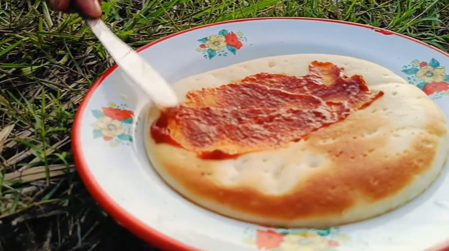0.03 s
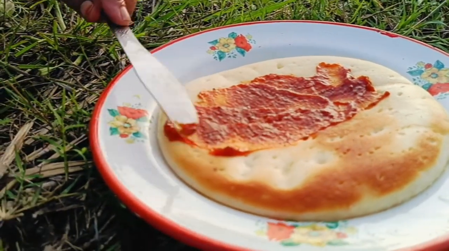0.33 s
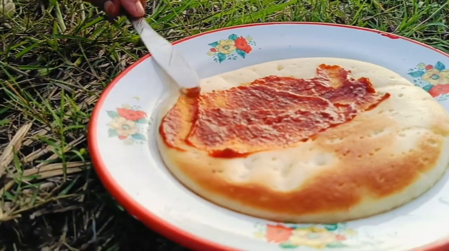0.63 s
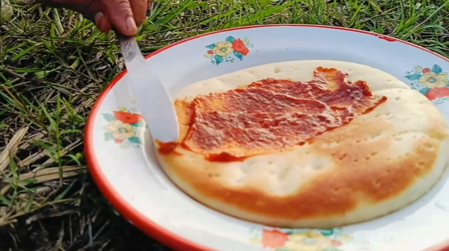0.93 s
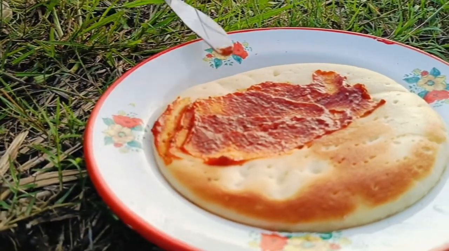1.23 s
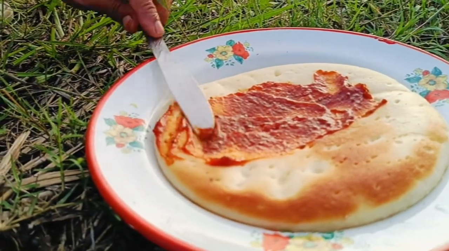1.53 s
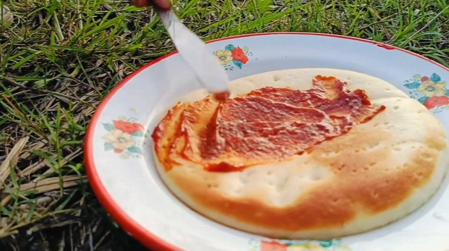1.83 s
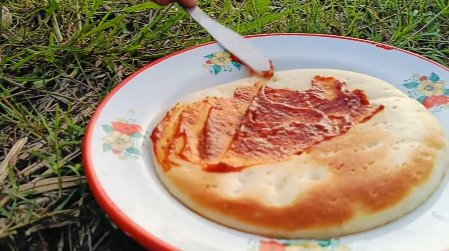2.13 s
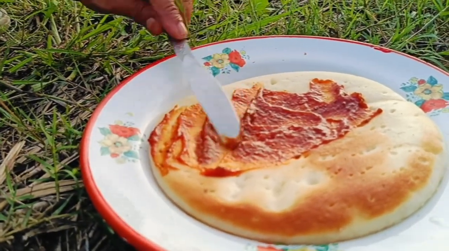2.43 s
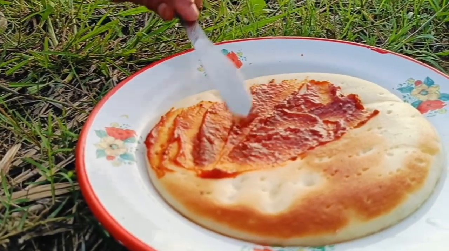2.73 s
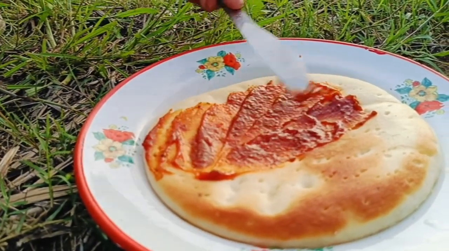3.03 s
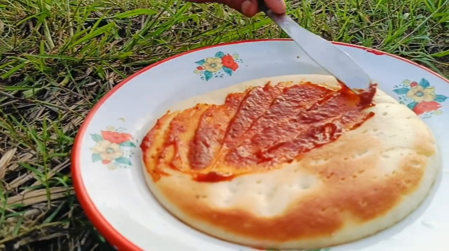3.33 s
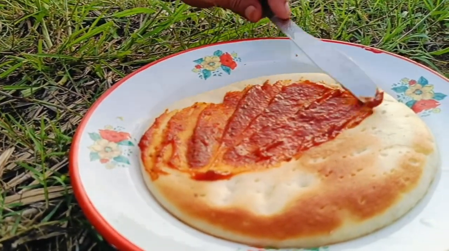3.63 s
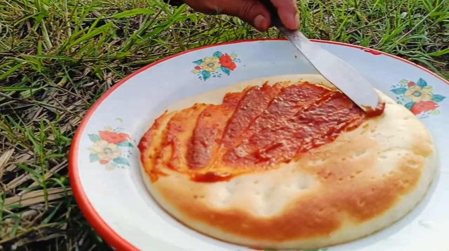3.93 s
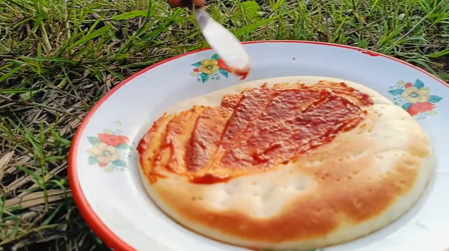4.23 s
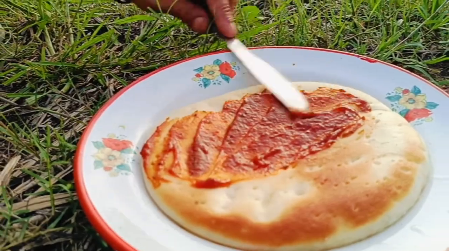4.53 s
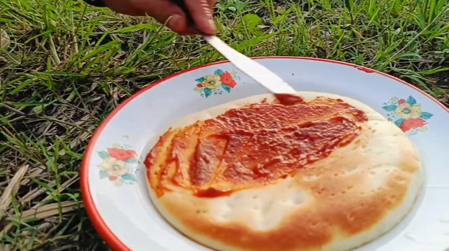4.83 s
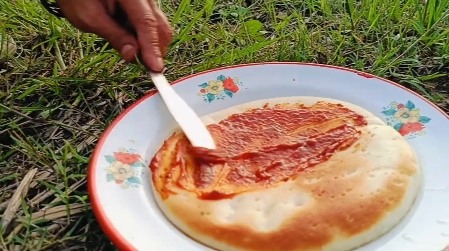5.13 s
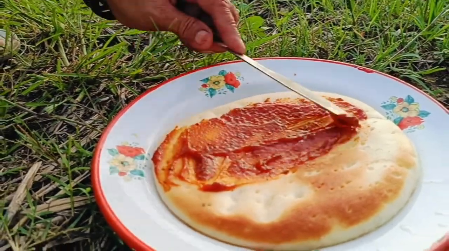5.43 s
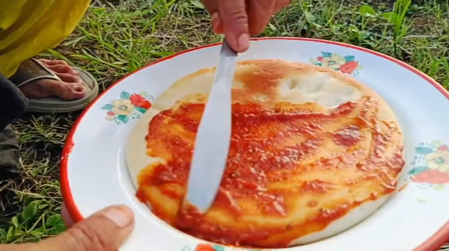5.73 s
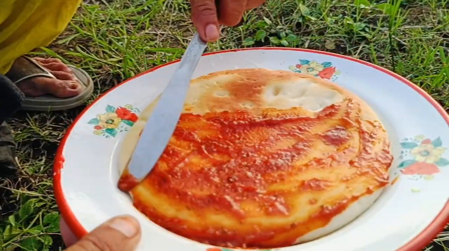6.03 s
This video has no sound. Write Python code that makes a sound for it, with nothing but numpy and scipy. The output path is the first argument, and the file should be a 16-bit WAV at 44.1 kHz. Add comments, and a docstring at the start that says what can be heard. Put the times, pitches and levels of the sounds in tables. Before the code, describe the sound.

A table knife spreads sauce over flatbread close by, opening with a soft wet pat and continuing in strokes about every half second, with dull pops, squelches and a fine hiss. The loudest sounds are quick, bright clinking scrapes of the blade over an enamel plate's rim, at about 0.7, 1.2, 1.7 and 2.2 seconds, each leaving a faint ring. From 2.5 to 4.2 seconds the wet strokes carry on with a few tiny sticky snaps. Two more rim scrapes come at 4.2 and 4.7 seconds, followed by softer spreading and a light blade tick at 6 seconds. Small birds give scattered high chirps and pips, the clearest at 2 seconds, with a rising whistle near 5.8 seconds, while others call faintly far off. Quiet outdoor air, a low rumble and an intermittent distant hum lie underneath.

```python
"""A soft wet pat, then strokes: a table knife spreads sauce over a flatbread on an enamel plate, on grass.
The sauce sticks and slips, giving dull pops through the bread, a fine hiss and sticky snaps.
Between strokes the blade chatters over the rim in six quick wipes; the rim rings on faintly.
Small birds chirp, pip and whistle nearby, others call far off, over outdoor air, a low rumble
and a distant hum."""
import sys
import numpy as np
from scipy import signal
from scipy.fft import rfft, irfft
from scipy.io import wavfile

SR = 44100
rng = np.random.default_rng(int(sys.argv[2]) if len(sys.argv) > 2 else 0)


def transcribe(u):
    """Save the signal u as a 16-bit wav file named by the first command-line argument.

    u: samples, shape (n,) or (channels, n), limited to [-1, 1]; the rate is SR.
    q: integer samples, one column per channel.
    """
    v = np.clip(np.atleast_2d(u).T, -1, 1)
    q = np.round(v * 32767).astype(np.int16)
    wavfile.write(sys.argv[1], SR, q)


N = 267995
TIME = np.arange(N) / SR
BINS = np.fft.rfftfreq(4096, 1 / SR)

# Spreading strokes. Each row: landing, firmest moment and end in seconds, pat, plop and squelch levels
# in dB, squelch pitch in Hz, hiss level in dB.
SAUCE_STROKES = [(0, 0.016, 0.12, -35.5, -36, -44.5, 400, -49.5),
                 (0.599, 0.636, 0.73, -60, -56, -57.5, 328, -61.5),
                 (1.111, 1.196, 1.374, -49, -49, -48, 366, -55.5),
                 (1.626, 1.675, 1.8, -36.5, -35, -51, 329, -61.5),
                 (2.085, 2.153, 2.227, -34.5, -40, -47, 427, -55.5),
                 (2.55, 2.596, 2.745, -32.5, -37, -45, 460, -61),
                 (2.93, 3.002, 3.044, -38.5, -39, -41, 450, -59.5),
                 (3.294, 3.363, 3.435, -35, -37, -39.5, 312, -56.5),
                 (3.661, 3.717, 3.79, -41, -50, -47.5, 380, -63.5),
                 (3.932, 3.962, 4.185, -30, -34, -40, 440, -46),
                 (4.601, 4.656, 4.73, -61, -61, -59, 353, -70),
                 (5.11, 5.154, 5.26, -57.5, -47, -56.5, 450, -61.5),
                 (5.212, 5.246, 5.38, -38.5, -36, -58, 512, -60.5),
                 (5.627, 5.654, 5.92, -44, -48.5, -62, 302, -64),
                 (6.001, 6.035, 6.13, -65, -58.5, -74, 563, -52.5)]
# Noise spectra of air and rumble. Each row: frequency in Hz, relative density in dB.
AIR_SPECTRUM = [(88, -41), (150, -3.5), (315, -16), (524, -16), (662, -20), (774, -20), (1530, -24),
                (2140, -23), (3220, -24.5), (4240, -24.5), (5680, -33.5), (8560, -30), (16000, -58)]
RUMBLE_SPECTRUM = [(20, -19.5), (45, -14), (70, 3.5), (110, -2), (160, -11.5), (260, -18), (500, -27),
                   (1500, -66.5)]
# Likeness of that noise at the two ears. Each row: frequency in Hz, correlation.
EAR_CORRELATION = [(50, .9), (200, 0.81), (600, 0), (2000, 0), (16000, 0.07)]
# Course of the rumble. Each row: time in seconds, level in dB.
RUMBLE_ENVELOPE = [(0, -53), (.7, -58), (2.1, -58), (2.8, -64.5), (5.3, -61), (6.08, -59)]
# Swells of the hum. Each row: start and end in seconds.
HUM_SPANS = [(.03, 0.35), (.41, 1.24), (1.3, 1.58), (1.63, 1.97), (2.02, 2.38), (5.62, 5.96)]
# Far birds. Each row: start and length in seconds, pitch in Hz, level in dB.
FAR_BIRD_CALLS = [(.18, .58, 2125, -70), (.88, .12, 3500, -70), (1.5, .12, 2502, -67.5),
                  (3.6, .09, 3590, -69)]
# Arched chirps. Each row: time of the top in seconds, top pitch in Hz, level in dB, delay from top to
# loudest point in seconds.
BIRD_CHIRPS = [(0.612, 8250, -57, 0.027), (.965, 7500, -73, 0.021), (2.031, 8560, -42, .03),
               (2.944, 8420, -58, 0.032), (3.655, 7840, -71, .025), (5.27, 8540, -57.5, 0.028),
               (5.491, 7860, -52, 0.013), (5.813, 7480, -67, 0.031)]
# Wipes over the rim. Each row: landing, firmest moment and leaving in seconds, clink, slide and push
# levels in dB, bass and treble trims in dB, frequency favoured by that spot in Hz, its lift in dB,
# squeal pitches of clink, slide and push in Hz.
RIM_WIPES = [(.709, 0.764, .794, -23.5, -34, -29.5, 0, -1, 830, 4, 3530, 9300, 3650),
             (1.248, 1.294, 1.322, -16, -26, -16.5, -2.5, 2, 2750, 4.5, 4550, 4780, 2830),
             (1.744, 1.794, 1.8385, -13, -30, -27, 0.5, 0.5, 1690, 2, 4530, 3900, 3780),
             (2.226, 2.269, 2.284, -13, -31.5, -27.5, -1.5, -0.5, 1254, 3.5, 3860, 4146, 2210),
             (4.188, 4.261, 4.293, -15, -31, -24.5, -1, 1, 1240, 7, 3800, 4200, 4900),
             (4.730, 4.751, 4.806, -20, -32, -27, -1.5, -1, 508, 12.5, 3660, 3700, 4760)]
# Modes of blade and plate in contact. Each row: frequency and width in Hz, left and right gains in dB.
CONTACT_MODES = [(416, 112, -11, -12), (515, 99, -14.5, -14), (804, 100, -11, -17.5),
                 (1218, 190, -12.5, -9), (1438, 117, -9, -9), (1855, 210, -11, -11.5), (2190, 114, -9, -35),
                 (2330, 193, -15, -21), (2720, 73, -15, -16), (2810, 71, -13.5, -14.5),
                 (3213, 73, -13, -10), (3530, 220, -11.5, -17), (3755, 190, -15.5, -1),
                 (4127, 185, -21, -10.5), (4460, 430, -34, -7.5), (4700, 250, -11.5, -4.5),
                 (5010, 300, -24.5, -11.5), (5354, 290, -27, -10.5), (5640, 170, -23, -10.5),
                 (6110, 239, -23, -11), (6470, 190, -27.5, -12), (6900, 160, -27, -8),
                 (7770, 180, -30.5, -5), (7950, 95, -23, -9.5), (8120, 490, -25.5, -13),
                 (9370, 510, -18.5, -12), (9060, 920, -17, -14.5), (9380, 239, -24.5, -24)]
# Floor between those modes. Each row: frequency in Hz, gain in dB.
CONTACT_FLOOR = [(40, -48), (250, -33), (1000, -42), (9500, -40), (10200, -41), (11500, -31.5),
                 (13500, -38.5), (16000, -44)]
# Sharp modes of the thin blade. Each row: frequency and width in Hz, relative gain in dB.
BLADE_MODES = [(1150, 26, -14.5), (1855, 45, -8), (2851, 34, -10), (3280, 33, -12), (4670, 64, -0.5),
               (6420, 33, -9), (7500, 40, -7), (7855.2, 23, -10.5), (8100, 55, -6.5)]
# Modes of the free plate. Each row: frequency in Hz, relative level in dB, T60 in seconds.
RIM_MODES = [(991, -10, .25), (1560, -2.5, 0.72), (2134, -0.5, .58), (2627, -2.5, .7), (2886.7, -4, 0.24),
             (3020, -9.5, 0.49), (3400, -1, 0.34), (3825, 11, 0.23), (4140, -3.5, 0.24),
             (4467.5, -7.5, 0.15)]
# Ring after each wipe. Each row: level in dB, frequency favoured by that spot in Hz, its lift in dB,
# time the knife presses again in seconds.
RIM_RELEASES = [(-60.5, 3410, 10.5, 1.13), (-46, 3800, 0, 1.9), (-52.5, 3800, 5, 2.07),
                (-52.5, 2130, 8, 2.5), (-51.5, 1570, 0.5, 4.6), (-58.5, 2280, 10, 4.93)]
# Sauce snaps and blade touches. Each row: start in seconds, level in dB, pitch in Hz, broad share in dB.
SNAP_TICKS = [(1.062, -46, 2700, -26), (3.613, -43, 10640, -20), (3.735, -43, 4170, -3),
              (3.832, -49.5, 9000, -29), (4.05, -33, 4270, -25), (4.546, -38, 2240, -25),
              (4.689, -38, 2140, -25.5), (4.963, -41.5, 1850, -21), (5.244, -43, 2063, -18),
              (6.005, -26.5, 2180, -3)]
# Pips of another bird. Each row: start in seconds, pitch in Hz, level in dB.
BIRD_PIPS = [(2.29, 2820, -53), (2.342, 2860, -67), (4.818, 2820, -58), (5.285, 2860, -65.5),
             (5.338, 2849, -63.5), (5.555, 2540, -66.5)]
# Rising bird whistle. Each row: time in seconds, pitch in Hz.
WHISTLE_PITCH = [(5.78, 2706), (5.924, 3427), (6.014, 4450), (6.034, 5050), (6.054, 5330), (6.077, 5083)]


def amp(db):
    """Decibels to gain."""
    return 10 ** (np.asarray(db) / 20)


def unit(x):
    """Scales to an rms of one."""
    return x / np.sqrt(np.mean(x ** 2) + 1e-20)


def read(points, hz):
    """Interpolates a spectrum table over log frequency."""
    knots_hz, values = np.transpose(points)
    return np.interp(np.log(hz + 1), np.log(knots_hz + 1), values)


def clock(length_s):
    """Sample times in seconds."""
    return np.arange(max(int(length_s * SR), 16)) / SR


def add(mix, start_s, sound):
    """Lays a sound into the stereo mix."""
    part = mix[:, max(round(start_s * SR), 0):][:, :sound.shape[-1]]
    part += sound[..., :part.shape[1]]


def pan(right_db):
    """Ear gains for a right-over-left level difference."""
    return amp([[-right_db / 2], [right_db / 2]]) / np.sqrt(np.mean(amp([-right_db, right_db])))


def drift(count, hz):
    """Random wander: lines between unit normal draws, hz of them a second."""
    knots = rng.standard_normal(4096)
    return np.interp(np.arange(count) * hz / SR, np.arange(len(knots)), knots)


def colour(x, gain):
    """Minimum-phase filter with this gain over BINS."""
    log_gain = np.log(np.maximum(np.atleast_2d(gain), 1e-5))
    mirrored = np.concatenate([log_gain, log_gain[:, -2:0:-1]], axis=1)
    response = np.fft.ifft(np.exp(np.conj(signal.hilbert(mirrored)))).real
    return signal.fftconvolve(np.atleast_2d(x), response, axes=1)


def bump(hz, width_hz):
    """Power response of one resonance over BINS."""
    return (1 + (2 * (BINS - hz) / width_hz) ** 2) ** -1.5


def grains(count, per_s, spread_db):
    """Randomly spaced tiny impacts of uneven size."""
    chance, size, sign = rng.random((3, count))
    strength = amp(spread_db * np.minimum(-np.log(size), 3))
    return unit((chance < per_s / SR) * strength * np.sign(sign - .5))


def noise(spectrum):
    """Steady stereo noise, most alike in the bass."""
    hz = np.fft.rfftfreq(N, 1 / SR)
    left, other = rfft(rng.standard_normal((2, N)))
    correlation = np.clip(read(EAR_CORRELATION, hz), -1, 1)
    right = correlation * left + np.sqrt(1 - correlation ** 2) * other
    return unit(irfft(np.array([left, right]) * amp(read(spectrum, hz)), N))


def tone(hz):
    """Unit-rms sine along a pitch curve."""
    return np.sqrt(2) * np.sin(2 * np.pi * np.cumsum(hz) / SR)


def bread_gain(hz, width_ratio, wet_db, wet_hz, muffle_hz=1500):
    """Gain through the bread: one dull hump, a wet skirt above it, no deep bass."""
    hump = np.sqrt(bump(hz, width_ratio * hz) / (1 + (BINS / muffle_hz) ** 4))
    skirt = amp(wet_db) / (1 + (BINS / wet_hz) ** 2) / (1 + (BINS / 8000) ** 8)
    return (hump + skirt) * BINS ** 2 / (BINS ** 2 + (hz / 3) ** 2)


def bread_pop(hz, width_ratio):
    """The bread's answer to one impulse: a few dull cycles and a small wet smack."""
    pop = colour(np.ones(1), bread_gain(hz, width_ratio, wet_db=-29, wet_hz=1900))
    return pop / abs(pop).max()


def spreading(swell_power=1.05, trail_db=-25.5, trail_power=1.8, rate_power=.9, clumps_db=3):
    """The blade pats the bread and presses; the sauce plops, then trails off in stick-slip and hiss."""
    out = np.zeros((2, N))
    hiss_gain = amp(read([(300, -17), (1200, 6), (2200, 3), (4300, 2.5), (6300, -4.5), (8300, -.5),
                          (9500, -7.5), (10500, -17.5), (16000, -18)], BINS))
    for land_s, firm_s, end_s, pat_db, plop_db, squelch_db, hz, hiss_db in SAUCE_STROKES:
        add(out, land_s, amp(pat_db) * bread_pop(hz, width_ratio=.65))
        add(out, firm_s, amp(plop_db) * bread_pop(hz, width_ratio=.22))
        t = land_s + clock(end_s - land_s)
        swell = np.interp(t, [land_s, firm_s], [0, 1]) ** swell_power
        press = swell * amp(trail_db * np.interp(t, [firm_s, end_s], [0, 1]) ** trail_power)
        clumps = press * amp(clumps_db * drift(len(t), hz=132.7))  # sauce lets go in clumps
        # light pressure thins the squelch into single pops
        slips = grains(len(t), per_s=1400 * press ** rate_power, spread_db=1)
        slips /= (press + 1e-6) ** (rate_power / 2)
        squelch = colour(clumps * slips, bread_gain(hz, width_ratio=.62, wet_db=-23, wet_hz=1300))
        squelch *= np.sqrt(np.sum(press ** 2) / np.sum(squelch ** 2 + 1e-20))
        add(out, land_s, amp(squelch_db) * squelch)
        fizz = np.array([grains(len(t), per_s=4000, spread_db=3.5) for ear in range(2)])
        hiss = colour(clumps * fizz, hiss_gain)
        hiss *= np.sqrt(2 * np.sum(press ** 2) / np.sum(hiss ** 2))
        add(out, land_s, amp(hiss_db - .5) * pan(right_db=5.5) * hiss)
    return out


def outdoors(air_db=-64, lumps_db=3, hum_db=-53.5, lull_db=-78.5, hum_hz=54.2, fade_s=.08):
    """Still air, a lumpy low rumble and a distant wavering hum that comes and goes."""
    rumble_db = np.interp(TIME, *np.transpose(RUMBLE_ENVELOPE)) + lumps_db * drift(N, hz=7.5)
    rumble = amp(rumble_db) * noise(RUMBLE_SPECTRUM)
    swells = sum(np.clip(np.minimum(TIME - start_s, end_s - TIME) / fade_s, 0, 1)
                 for start_s, end_s in HUM_SPANS)
    hum_level = (amp(lull_db) + amp(hum_db) * swells) * amp(.5 * drift(N, hz=2.8))
    hum = hum_level * tone(hum_hz * (1 + .04 * drift(N, hz=12)))
    air = amp(air_db + .34 * drift(N, hz=3.8)) * noise(AIR_SPECTRUM)
    return air + rumble + hum


def far_calls(blur_ratio=.063, overtone_db=-9):
    """Far bird calls swell and fade, their pitch blurred differently at each ear."""
    out = np.zeros((2, N))
    for start_s, length_s, call_hz, db in FAR_BIRD_CALLS:
        swell = amp(db) * np.hanning(len(clock(length_s)))
        for ear in np.eye(2):
            hz = call_hz * (1 + blur_ratio * drift(len(swell), hz=703))
            add(out, start_s, ear[:, None] * swell * (tone(hz) + amp(overtone_db) * tone(2 * hz)))
    return out


def chirps(arch_s=.045, lead_s=.028, rise_db_per_s=480.5, fall_db_per_s=901, upper_ratio=1.15):
    """Bell-shaped pitch arches; the two sides of the syrinx sing a little apart."""
    out, t = np.zeros((2, N)), clock(.074) - lead_s
    for top_s, top_hz, db, loudest_s in BIRD_CHIRPS:
        hz = top_hz * np.exp(-(t / arch_s) ** 2) * (1 + .0277 * drift(len(t), hz=850))
        drop_db = np.maximum(rise_db_per_s * (loudest_s - t), fall_db_per_s * (t - loudest_s))
        voices = tone(hz) + amp(-2) * tone(hz * upper_ratio)
        add(out, top_s - lead_s, amp(db - drop_db) * signal.windows.tukey(len(t), .25) * voices)
    return out


def chatter(grip, gain, grit=.52, stereo_spread=.68):
    """The edge chatters over enamel as hard as it grips; each impact rings with this gain over BINS."""
    force = grains(len(grip), per_s=1800, spread_db=3.5) + grit * rng.standard_normal(len(grip))
    force = force + stereo_spread * rng.standard_normal((2, len(grip)))
    sound = colour(force * grip, gain)
    return sound * np.sqrt(2 * np.sum(grip ** 2) / np.sum(sound ** 2))


def wipes(rise_s=.0015, lift_off_s=.014, hold_s=.003, clink_t60_s=.045, push_width_s=.0084,
          parting_lead_s=.011, parting_width_s=.0054, spot_width_ratio=.26, right_lag_s=.00015):
    """The blade clinks onto the rim, slides, is pushed once more and leaves; it rings with the plate."""
    out = np.zeros((2, N))
    contact_power = sum(amp([[left_db], [right_db]]) ** 2 * bump(hz, width_hz)
                        for hz, width_hz, left_db, right_db in CONTACT_MODES)
    blade_power = sum(amp(db - 1.5) ** 2 * bump(hz, width_hz) for hz, width_hz, db in BLADE_MODES)
    floor = amp(read(CONTACT_FLOOR, BINS)) * pan(right_db=8.5)
    body = np.sqrt(contact_power + blade_power * pan(right_db=12) ** 2 + floor ** 2)
    for (land_s, firm_s, leave_s, clink_db, slide_db, push_db, bass_db, treble_db,
         spot_hz, lift_db, clink_hz, slide_hz, push_hz) in RIM_WIPES:
        spot_db = lift_db * bump(spot_hz, spot_width_ratio * spot_hz)
        t = clock(leave_s - land_s + lift_off_s / 2)
        contact = np.minimum(t / rise_s, 1) * np.minimum((t[-1] - t) / lift_off_s, 1)
        clink = amp(clink_db - 60 * np.maximum(t - hold_s, 0) / clink_t60_s)
        # the edge catches and slips, with a last catch just before it leaves
        catch_db = 2.5 * drift(len(t), hz=170)
        parting_db = 2.5 * np.exp(-((land_s + t - leave_s + parting_lead_s) / parting_width_s) ** 2)
        slide = amp(slide_db + parting_db + catch_db)
        push = amp(push_db) * np.exp(-((land_s + t - firm_s) / push_width_s) ** 2 / 2)
        # the contact point moves along the blade, so each phase favours other modes
        for grip, low_db, mid_db, high_db, squeal_db, squeal_hz in (
                (clink, 0, .5, 2, 7, clink_hz),
                (slide, -5.5, .5, 1, 7.5, slide_hz),
                (push, -4, -2.5, -1, 9, push_hz)):
            tilt = [(500, low_db + bass_db), (1700, mid_db), (4200, 0), (8000, high_db + treble_db)]
            tone_db = read(tilt, BINS) + spot_db + squeal_db * bump(squeal_hz, width_hz=260)
            add(out, land_s - rise_s / 2, chatter(grip * contact, body * amp(tone_db)))
    return np.array([out[0], np.interp(TIME - right_lag_s, TIME, out[1])])


def rim_ring(spot_octaves=.17, split_hz=7.2, twin_gain=.23, damping_db_per_s=130,
             lead_s=.013, rise_s=.0089):
    """The freed rim rings on, each mode a beating pair, until the knife presses again and damps it."""
    out, t = np.zeros((2, N)), clock(.7)
    ear_cycles = np.array([[0], [.2]])  # the ears face different lobes of a mode
    for (_, _, leave_s, *_), (ring_db, spot_hz, lift_db, press_s) in zip(RIM_WIPES, RIM_RELEASES):
        start_s = leave_s - lead_s
        damped_db = damping_db_per_s * np.maximum(start_s + t - press_s, 0)
        for hz, mode_db, t60_s in RIM_MODES:
            spot_db = lift_db * np.exp(-(np.log2(hz / spot_hz) / spot_octaves) ** 2)
            main_cycles, twin_cycles = rng.random(2)
            main = np.sin(2 * np.pi * (hz * t + main_cycles + ear_cycles))
            twin = np.sin(2 * np.pi * ((hz + split_hz) * t + twin_cycles - ear_cycles))
            decay = amp(ring_db + mode_db + spot_db - 60 * t / t60_s - damped_db)
            add(out, start_s, decay * (main + twin_gain * twin) * np.minimum(t / rise_s, 1))
    return out * pan(right_db=-3)


def ticks(t60_cycles=84, width_ratio=.12):
    """Sauce snaps and light blade touches: bursts with one main resonance, shorter when higher."""
    out, t = np.zeros((2, N)), clock(.06)
    broad = amp(read([(100, -11), (500, 4.5), (5000, -.5), (9000, -2), (10500, -25), (16000, -18)], BINS))
    for start_s, db, hz, broad_db in SNAP_TICKS:
        burst = rng.standard_normal((2, len(t))) * amp(-60 * t * hz / t60_cycles)
        tick = colour(burst, np.sqrt(bump(hz, width_ratio * hz)) + amp(broad_db) * broad)
        add(out, start_s, amp(db) * tick / abs(tick).max())
    return amp(2) * out * pan(right_db=3.5)


def pips(length_s=.021, overtone_db=-4):
    """Another bird's short, wavering notes with an octave overtone."""
    out, count = np.zeros((2, N)), len(clock(length_s))
    for start_s, pip_hz, db in BIRD_PIPS:
        hz = pip_hz * (1 + .0277 * drift(count, hz=500))
        add(out, start_s, amp(db) * np.hanning(count) * (tone(hz) + amp(overtone_db) * tone(2 * hz)))
    return out


def whistle(level_db=-48, rise_s=.21, right_phase_rad=2.4):
    """One rising, swelling bird whistle that reaches the ears out of step."""
    out = np.zeros((2, N))
    knots_s, knots_hz = np.transpose(WHISTLE_PITCH)
    t = clock(knots_s[-1] - knots_s[0])
    swell = np.minimum(t / rise_s, 1) ** 1.18 * amp(level_db + 1.6 * drift(len(t), hz=70.5))
    hz = np.interp(knots_s[0] + t, knots_s, knots_hz) * (1 + .0036 * drift(len(t), hz=200))
    analytic = signal.hilbert(swell * tone(hz))
    add(out, knots_s[0], (analytic * np.exp([[0], [1j * right_phase_rad]])).real)
    return out


def scatter(x, near_db, near_t60_s, tail_db, tail_t60_s):
    """Adds quick scatter from nearby surfaces and a faint open-air tail."""
    t = clock(.54)
    near = unit(rng.standard_normal((2, len(t))) * amp(-60 * t / near_t60_s))
    tail = unit(rng.standard_normal((2, len(t))) * amp(-60 * t / tail_t60_s))
    echo = (amp(near_db) * near + amp(tail_db) * tail) / np.sqrt(len(t))
    return x + signal.fftconvolve(x, echo, axes=1)[:, :N]


def scene():
    """Knife and plate close by; birdsong scatters off plants, wipes and ticks off plate and ground."""
    birds = (chirps() + pips() + whistle()) * pan(right_db=10.5) + far_calls()
    birds = scatter(birds, near_db=-1, near_t60_s=.049, tail_db=-16, tail_t60_s=.4)
    knife = scatter(wipes() + ticks(), near_db=-13, near_t60_s=.054, tail_db=-40, tail_t60_s=.41)
    return knife + birds + rim_ring() + spreading() + outdoors()


def record(dry):
    """Steep low-pass at 16.3 kHz."""
    lowpass = signal.firwin(511, 16300, window=("kaiser", 9), fs=SR)
    return signal.oaconvolve(dry, lowpass[None], "same")


dry = scene()
out = record(dry)
transcribe(out)
```